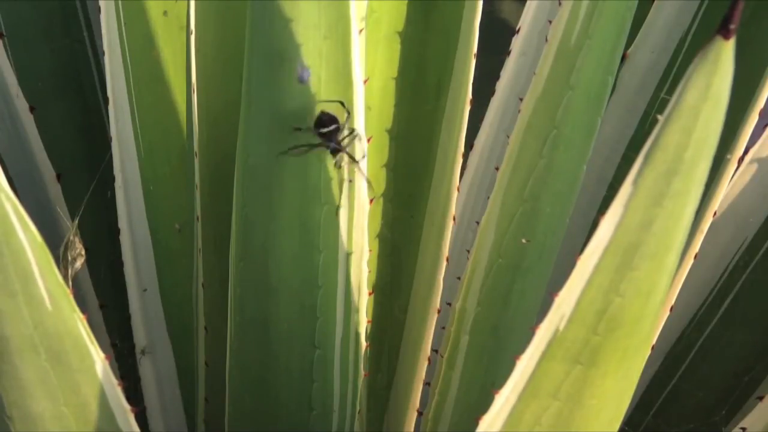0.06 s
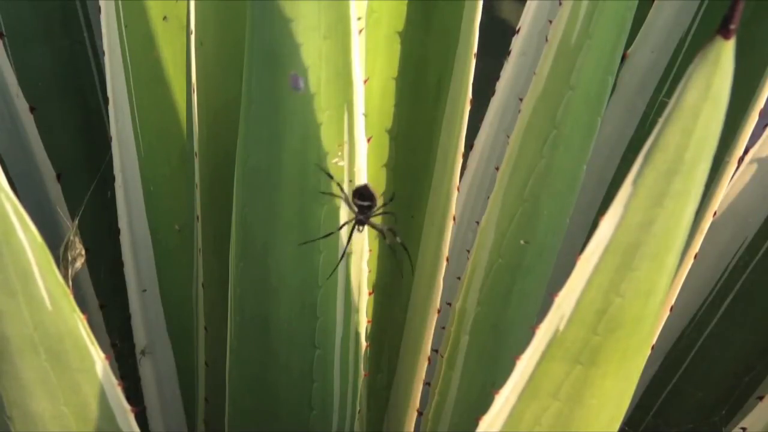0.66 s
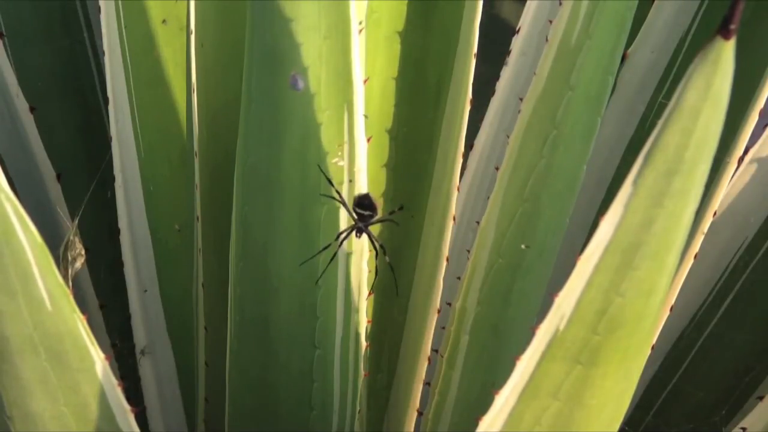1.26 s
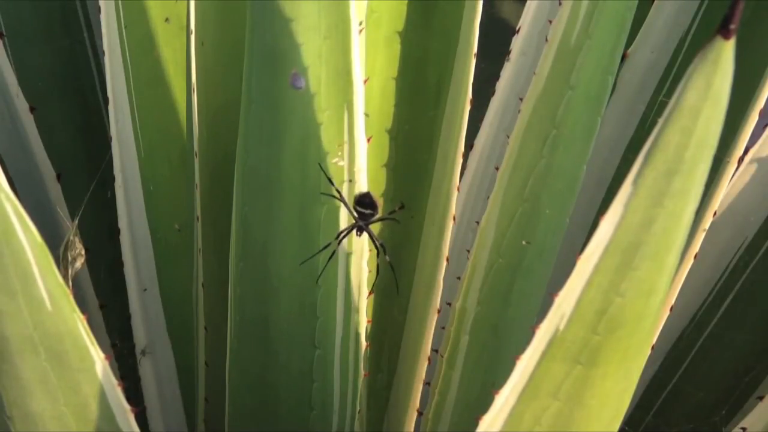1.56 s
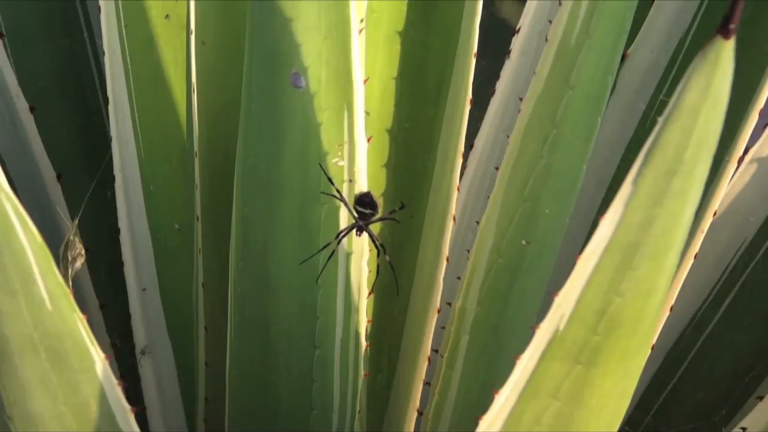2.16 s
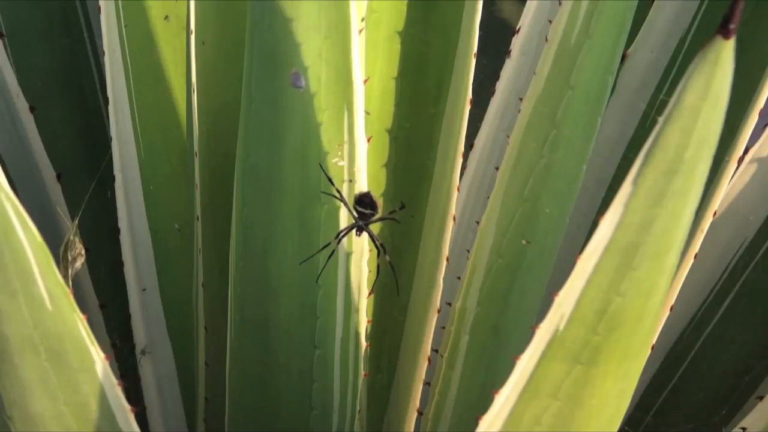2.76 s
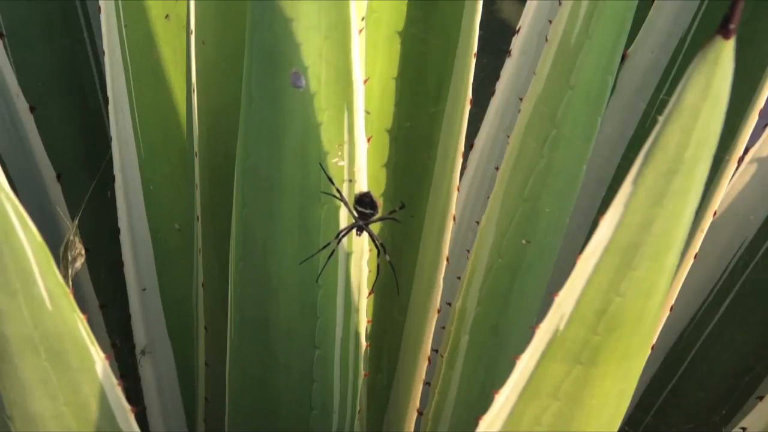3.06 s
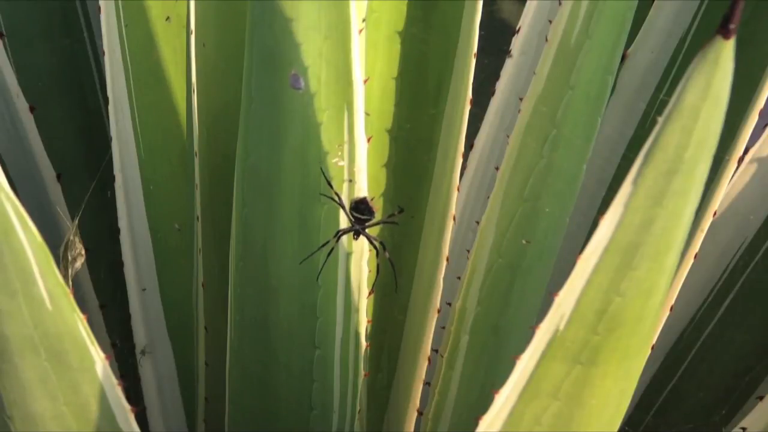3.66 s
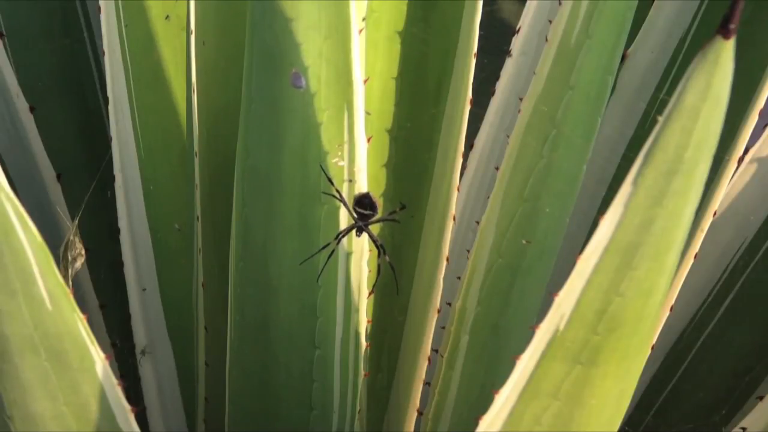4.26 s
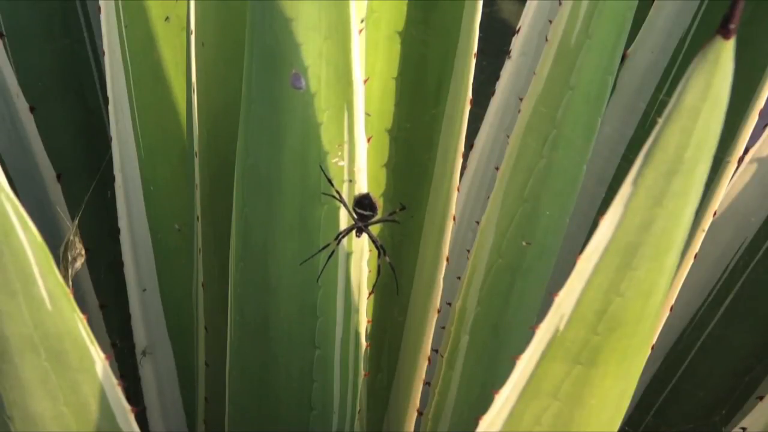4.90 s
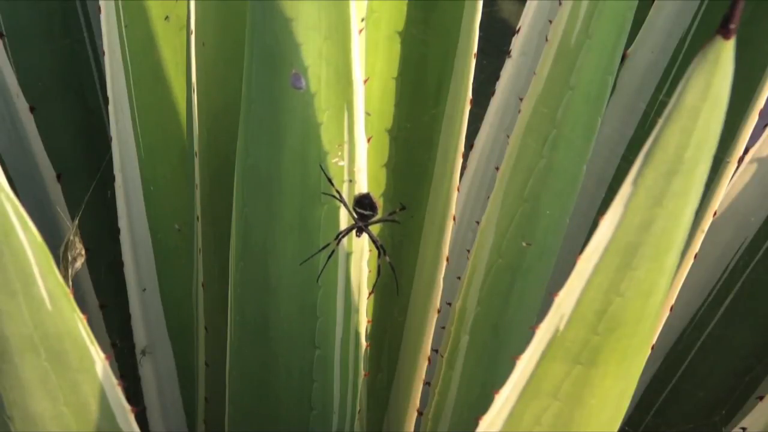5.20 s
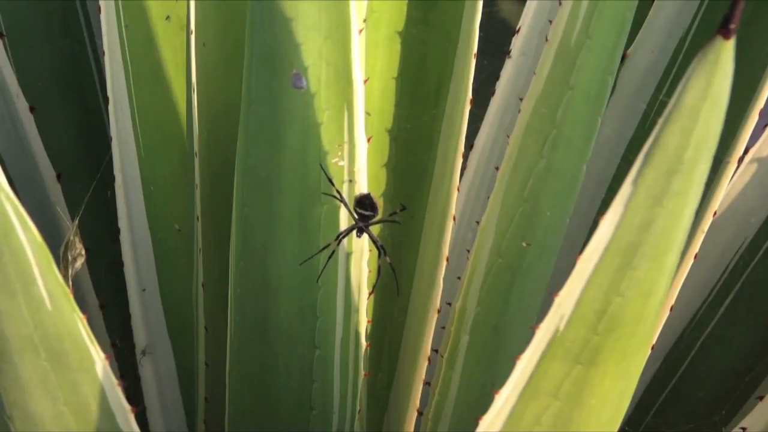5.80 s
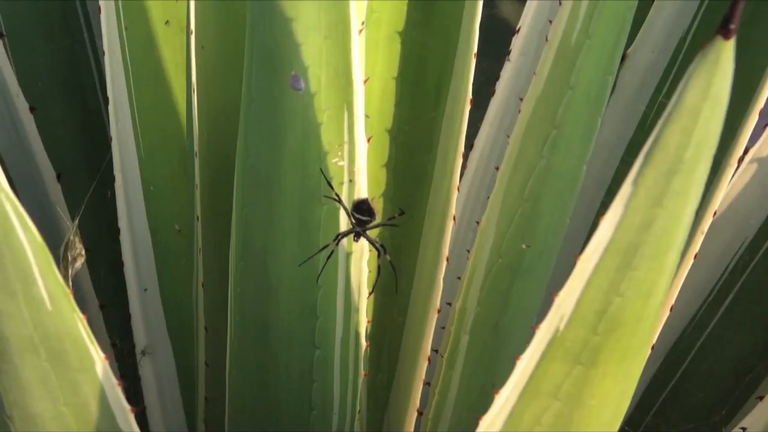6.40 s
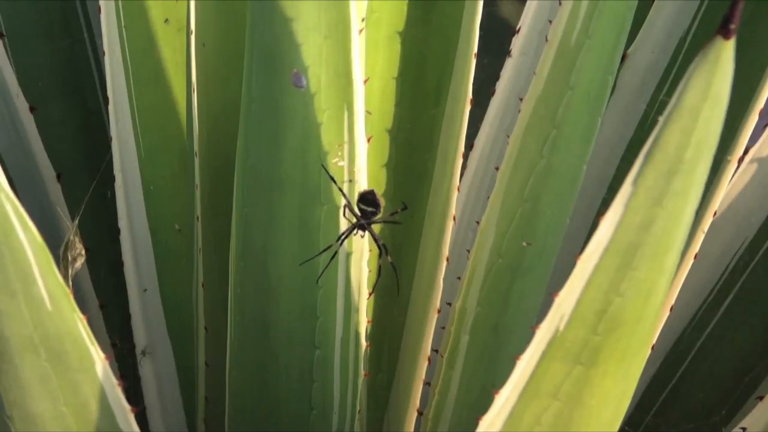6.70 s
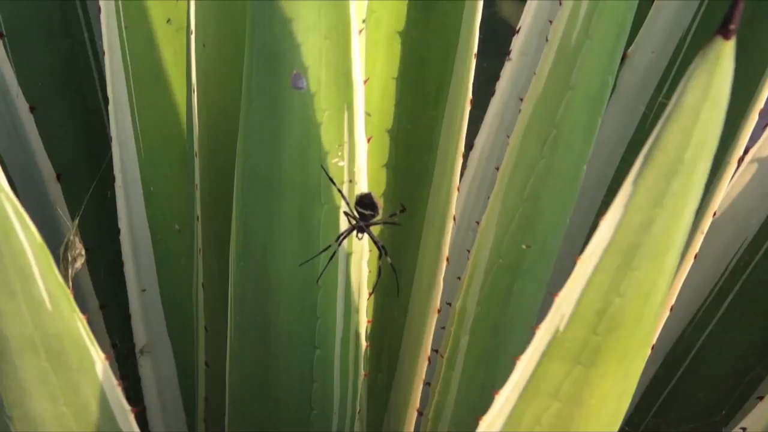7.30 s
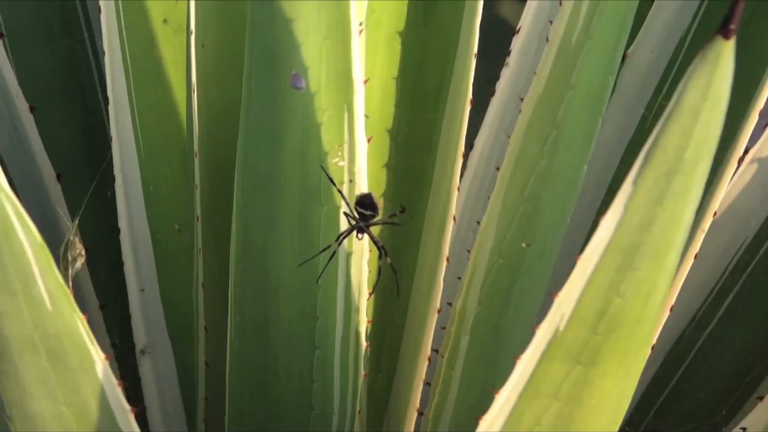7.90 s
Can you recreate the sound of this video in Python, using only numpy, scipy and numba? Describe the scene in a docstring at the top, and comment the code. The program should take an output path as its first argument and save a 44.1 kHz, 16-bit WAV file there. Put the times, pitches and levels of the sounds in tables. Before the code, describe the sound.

In a garden, a songbird straight ahead whistles quick high-low note pairs over distant traffic and soft hiss. A crow on the left gives six harsh, rasping caws while small birds chirp faintly far away. The songbird returns midway, the crow stops, and one sharp chip sounds close by. A last whistled phrase follows near the end, ringing lightly off walls and trees.

```python
"""A garden by day opens on the rush of distant traffic, soft hiss, a faint machine hum and, straight ahead,
a songbird's falling whistles ringing among walls and trees. Small birds start up far away as a crow on
the left begins six caws, each a fluttering rasp pulsed through throat and beak. The songbird returns at
3 s; the crow stops, one sharp chip sounds close by at 5 s, and a last whistled phrase follows at 6.6 s.
Throughout, the recorder's gain control ducks the background under the louder calls."""
import sys
import numpy as np
from scipy import signal
from scipy.fft import rfft, irfft, next_fast_len
from scipy.io import wavfile
from scipy.ndimage import uniform_filter1d, map_coordinates
from numba import njit

SR = 44100
rng = np.random.default_rng(int(sys.argv[2]) if len(sys.argv) > 2 else 0)


def dump_mix(stems):
    """Bounce the given channels to the path in sys.argv[1] as a 16-bit WAV at rate SR."""
    frames = np.atleast_2d(stems).T  # one column per channel
    limited = np.clip(frames, -1, 1)  # hard clip at full scale
    pcm = np.round(limited * 32767).astype(np.int16)
    wavfile.write(sys.argv[1], SR, pcm)


N = 355001

# fader ride of the traffic: time_s, level_db
TRAFFIC_RIDE = [(0, -37.5), (.6, -36.5), (1.15, -34.5), (1.7, -35.5), (2.3, -36), (3.7, -37.5),
                (6.3, -38.5), (7.1, -38.5), (8.05, -37.5)]
# tone of the traffic: frequency_hz, gain_db
TRAFFIC_EQ = [(15, -63), (25, -23), (102, -20), (131, -16.5), (198, -14.5), (264, -9.5), (305, -11),
              (360, -8), (591, -5), (758, -0.5), (823, -2), (1170, -6), (2970, -17.5), (3500, -28.5),
              (4550, -49), (7700, -120)]
# tyre brightness, a shelf above about 1 kHz: time_s, gain_db
TYRE_RIDE = [(0, 0), (2.5, -0.5), (4.8, 0.5), (5.6, -3), (6.5, 2), (7.1, -1), (8.05, -3)]
# tone of the hiss: frequency_hz, gain_db
HISS_EQ = [(1200, -31), (2600, 2.5), (4200, 4), (6000, 1), (8500, -2), (11500, -1.5), (12500, -19)]
# how alike the two sides of the noise beds are: frequency_hz, correlation
BED_LIKENESS = [(60, .05), (280, 0.13), (600, 0.23), (1300, 0.33), (2700, 0.067), (4500, 1), (8000, 1)]
# balance of the noise beds: frequency_hz, left_over_right_db
BED_PAN = [(60, -2.5), (130, -8.5), (280, -4.5), (590, -3), (1280, 0), (2740, 0.5), (5890, 0), (12600, 0)]
# machine tones: pitch_hz, level_db, loudest_at_s, fade_to_half_s
HUM_TONES = [(138, -70, 6.9, 4.4), (321.7, -54, 1.2, 1.1), (269.6, -57.5, 6.8, 3.8), (754, -47, 6.6, 1.8)]
# the garden's reverb tail: frequency_hz, t60_s
GARDEN_DECAY = [(300, 0.36), (1300, 0.91), (2700, 0.83), (3500, 0.65), (6000, 0.83), (11000, 0.38)]

# long slurred whistles: start_s, length_s, level_db, swell_db, crest_share, swell_width_share
SLUR_NOTES = [(2.949, .23, -18, 14, .87, .16), (6.568, .28, -25.5, 9, .64, .33)]
# a high note, then a low one: start_s, high_db, low_db, low_length_s, pitch_ratio
COUPLET_NOTES = [(-.069, -26, -17, 0.078, 1), (0.204, -25, -16.5, 0.078, .998),
                 (3.283, -23.5, -14, 0.1, 0.99), (3.566, -23.5, -14, .077, 0.99),
                 (6.917, -28, -18, 0.1, 1.008), (7.179, -24.5, -19, 0.11, 1)]
# each whistle's fall: start_hz, settled_hz, glide_s
SLUR_GLIDE = (6670, 5780, 0.19)
HIGH_GLIDE, LOW_GLIDE = (5790, 5022, .075), (3770, 3405, .078)
# the farthest bird: start_s, end_s, pitch_hz, level_db
TWITTER_RUN = (.3, 3.2, 4150, -48.5)

# the crow's calls: start_s, length_s, level_db, pitch_hz, flutter_hz, roughness_share, mouth_hz,
# upper_resonances_db, brightening_db, climax_share, left_over_right_db
CAW_CUES = [(.34, 0.38, -24.8, 312.4, 57, 0.09, 1780, 0, -5, 0.79, 9.5),
            (0.929, 0.4, -22.5, 312.5, 56, 0.15, 1730, -.5, 7, 0.76, 10.5),
            (1.675, 0.4, -19.7, 337.9, 52, 0.16, 1760, -1.5, 1.5, .83, 12),
            (2.438, 0.41, -23.3, 343.1, 55.5, 0.14, 1590, -4.7, 3, .86, 9),
            (3.244, .42, -24.3, 337.4, 52, 0.16, 1690, -4, 7, .81, 9.5),
            (4.089, .472, -24.7, 334.3, 53, .15, 1850, -5, 3, 0.77, 9)]
# the course of one caw: length_share, pitch_ratio, pulsing_depth, strain_ratio, beak_opening_db
CAW_SHAPE = [(0, .79, 0.75, .1, -30), (.06, .88, 0.33, 0.22, -8), (.13, 1.02, 0.35, .8, -5),
             (.23, 1.035, 0, .85, -1), (.66, .968, 0.3, 1, 1), (.8, 1.11, 0, 3.4, 4.5),
             (.9, 1.26, 0.4, 1.6, 0.5), (.95, 1, 0.45, .3, -14), (1, .87, 0.8, 0.11, -17)]
SHAPE_CLIMAX = .8  # where that course peaks; each caw gets there sooner or later
# steady throat resonances: centre_hz, width_hz, gain_db
THROAT_MODES = [(1014, 257, -5.5), (1900, 165, -6.5), (2723, 260, -15.5)]
# how the beak radiates: frequency_hz, gain_db
BEAK_EQ = [(250, -30), (550, -13), (950, 2), (2000, -2), (2280, 2), (2600, 5), (2950, -2), (3500, -15),
           (5000, -12.5), (9000, -21)]
CAW_ATTACK_S, CAW_ATTACK_DB = .019, 16.5  # a caw swells from this far below its full level
CAW_SAG_DB_PER_S, CAW_RELEASE_S, CAW_RELEASE_DB = 1.5, .017, 9

# far birds: start_s, pitch_hz, rise_hz, level_db
CHIRP_CUES = [(.43, 4160, -150, -42), (2.125, 4160, 70, -41), (2.275, 4200, 98, -44),
              (2.825, 4100, -130, -44), (5.4, 4290, 127, -40.5), (5.69, 4230, 98, -41),
              (5.845, 3500, 380, -46), (7.605, 4640, 180, -38.5), (7.61, 4260, 98, -46.5),
              (7.96, 3400, 400, -44.5)]
CHIRP_S, CHIRP_ARCH_HZ = .0837, 69.4  # each chirp arches upward in the middle
# dry ticks: start_s, length_s, level_db
TICK_CUES = [(2.404, .04, -48), (5.979, 0.028, -43)]
# tone of a tick: frequency_hz, gain_db
TICK_EQ = [(2500, -40), (4000, -11), (6600, 6), (8000, -33)]
# the close chip: start_s, length_s, pitch_hz, rise_hz, level_db
CHIP_CUE = (4.967, .02, 4775, -2250, -36)


def amp(db):
    return 10 ** (np.asarray(db) / 20)


def unit(x):
    return x / np.sqrt(np.mean(x ** 2) + 1e-20)


def along(points, hz):
    """Read a curve of (frequency_hz, value) points on a log axis."""
    f, v = np.transpose(points)
    return np.interp(np.log(hz + 1), np.log(f + 1), v)


def curves(rows, at):
    """Each column after the first, read at the given places."""
    places, *columns = np.transpose(rows)
    return [np.interp(at, places, column) for column in columns]


def wobble(rate, n):
    """A smooth random curve of n samples, rate knots a second."""
    knots = rng.standard_normal(int(n * rate / SR) + 4)
    return map_coordinates(knots, [np.arange(n) * rate / SR], order=3)


def filtered(x, response):
    """Shape x with a complex frequency response."""
    n = x.shape[-1]
    padded = next_fast_len(n + SR // 8)
    return irfft(rfft(x, padded) * response(np.fft.rfftfreq(padded, 1 / SR)), padded)[..., :n]


def pan(db):
    """Left and right gains whose mean is one; positive is left."""
    gains = np.array([amp(db / 2), amp(-db / 2)]).reshape(2, -1)
    return gains / gains.mean(0)


def add(out, start_s, x):
    """Mix x into out from start_s on."""
    i = round(start_s * SR)
    x = x[:, max(-i, 0):N - i]
    out[:, max(i, 0):max(i, 0) + x.shape[1]] += x


def noise_bed(eq, patchy_db):
    """Stereo noise with patches of random gain, wide in the bass and narrow in the treble."""
    bins = signal.stft(rng.standard_normal((2, N)), nperseg=1024)[2]
    patches = uniform_filter1d(rng.standard_normal(bins.shape[1:]), size=7, axis=0)
    patches = uniform_filter1d(patches, size=10, axis=1)
    noise = signal.istft(bins * amp(patchy_db * unit(patches)), nperseg=1024)[1][:, :N]
    width = lambda f: np.arccos(np.clip(along(BED_LIKENESS, f), -1, 1)) / 2
    mid, side = filtered(noise, lambda f: amp(along(eq, f)) * [np.cos(width(f)), np.sin(width(f))])
    return filtered(np.array([mid + side, mid - side]), lambda f: pan(along(BED_PAN, f))) / np.std(mid)


def traffic():
    """A distant road whose tyre noise comes and goes."""
    t = np.arange(N) / SR
    road = noise_bed(TRAFFIC_EQ, patchy_db=1.0)
    tyres = filtered(road, lambda f: along([(900, .058), (1500, .87)], f))
    road = road + (amp(curves(TYRE_RIDE, t)[0]) - 1) * tyres
    return amp(curves(TRAFFIC_RIDE, t)[0] + .37 * wobble(5.8, N)) * road


def hiss(level_db=-45):
    """A soft, steady bed of treble."""
    return amp(level_db) * noise_bed(HISS_EQ, patchy_db=1.2)


def machine_hum():
    """Wavering tones on the right, each swelling and fading in its own time."""
    t = np.arange(N) / SR
    hum = np.zeros(N)
    for hz, db, crest_s, fade_s in HUM_TONES:
        phase = 2 * np.pi * np.cumsum(hz * (1 + .007 * wobble(16, N))) / SR
        hum += unit(np.sin(phase)) * amp(db + 2.5 * wobble(16, N)) / (1 + ((t - crest_s) / fade_s) ** 2)
    return hum * pan(-20)


def outdoors(x, pan_db, near_db, near_t60, far_db, spread):
    """Direct sound, quick scatter off walls and leaves, and the garden's tail share the energy of x."""
    hz, t, bins = signal.stft(rng.standard_normal((2, SR * 3 // 4)), SR, nperseg=256)
    tail = signal.istft(bins * amp(-60 * t / along(GARDEN_DECAY, hz)[:, None]), SR, nperseg=256)[1]
    t = np.arange(tail.shape[1]) / SR
    tail *= 1 - np.exp(-t / .026)
    scatter = rng.standard_normal(tail.shape) * amp(-60 * t / near_t60) * (t > .004)
    widen = lambda r: np.array([r[0] + spread * r[1], r[0] - spread * r[1]]) / np.linalg.norm(r[0])
    paths = amp(near_db) * widen(scatter)
    paths[:, 0] += 1  # the direct sound
    paths = paths * pan(pan_db) + amp(far_db) * widen(tail) * pan(pan_db / 2)
    heard = signal.fftconvolve(x[None], paths, axes=1)
    return heard * np.linalg.norm(x) / np.linalg.norm(heard.mean(0))


def whistle(glide, length_s, db, swell_db, crest, width, hook_hz=0, hook_s=.006, octave_db=-40):
    """A pure note that swells once while its pitch falls and settles; it may open with an upward hook."""
    start_hz, settled_hz, glide_s = glide
    t = np.arange(int(length_s * SR)) / SR
    fall_hz = (start_hz - settled_hz) * np.maximum(1 - t / glide_s, 0) ** 2
    offset_hz = fall_hz - hook_hz * np.exp(-t / hook_s)
    hz = settled_hz + offset_hz * (1 + .05 * wobble(336, len(t)))  # unsteady until it settles
    swell = amp(swell_db * (np.exp(-((t / length_s - crest) / width) ** 2) - 1))
    phase = 2 * np.pi * np.cumsum(hz) / SR
    tone = unit(np.sin(phase) + amp(octave_db) * np.sin(2 * phase))
    return amp(db) * swell * signal.windows.tukey(len(t), .25) * tone


def songbird(high_length_s=.063, low_delay_s=.05):
    """Long slurs and couplets; echoes beat against the notes, and leaves scatter the high ones more."""
    out = np.zeros((2, N))
    for start_s, *note in SLUR_NOTES:
        slur = whistle(SLUR_GLIDE, *note, octave_db=-30)
        add(out, start_s, outdoors(slur, 0, near_db=-2, near_t60=.27, far_db=-16, spread=.055))
    for start_s, high_db, low_db, low_length_s, ratio in COUPLET_NOTES:
        tuning = np.array([ratio, ratio, 1])
        high = whistle(HIGH_GLIDE * tuning, high_length_s, high_db, swell_db=9, crest=.43, width=.36)
        low = whistle(LOW_GLIDE * tuning, low_length_s, low_db,
                      swell_db=7, crest=.33, width=.36, hook_hz=209)
        add(out, start_s, outdoors(high, 0, near_db=1.5, near_t60=.33, far_db=-12.5, spread=.07))
        add(out, start_s + low_delay_s,
            outdoors(low, 0, near_db=-4, near_t60=.25, far_db=-12.5, spread=.65))
    return out


def peep(length_s, pitch_hz, rise_hz, db):
    """A small bird's note: a short, arched, slightly wavering glide."""
    n = int(length_s * SR)
    sweep = np.linspace(-1, 1, n)
    hz = pitch_hz + rise_hz * sweep / 2 + CHIRP_ARCH_HZ * (.5 - 2 * sweep ** 2)
    hz *= 1 + .0077 * wobble(112, n)
    return amp(db) * np.sin(2 * np.pi * np.cumsum(hz) / SR) * signal.windows.tukey(n, .6)


def twitter(count=20, scatter_hz=70):
    """The farthest bird's faint chirps run together into one wavering line."""
    start_s, end_s, pitch_hz, db = TWITTER_RUN
    song = np.zeros((1, N))
    for k, (late, high, rise) in enumerate(rng.standard_normal((count, 3))):
        note = peep(CHIRP_S, pitch_hz + scatter_hz * high, 2 * scatter_hz * rise, db)
        add(song, start_s + (end_s - start_s) * (k + .3 * late) / count, note[None])
    return outdoors(song[0], 0, near_db=0, near_t60=.25, far_db=2, spread=.1)[:, :N]


@njit
def resonate(x, hz, width_hz):
    """A resonance whose centre moves."""
    y, ring = np.zeros(len(x)), 0j
    for i in range(len(x)):
        ring = ring * np.exp((-np.pi * width_hz + 2j * np.pi * hz[i]) / SR) + x[i]
        y[i] = ring.real * 2 * np.pi * width_hz / SR
    return y


def caw(length_s, db, pitch_hz, flutter_hz, rough, mouth_hz, upper_db, brighten_db, climax,
        throat_width_hz=400., mouth_width_hz=220, mouth_db=-10):
    """Uneven syrinx pulses, shaken in pitch and strength by a slower flutter, ring throat and mouth."""
    n = int(length_s * SR)
    t = np.arange(n) / SR
    progress = np.interp(t / length_s, [0, .5, np.clip(climax, .6, .95), 1], [0, .5, SHAPE_CLIMAX, 1])
    bend, pulsing, strain, open_db = curves(CAW_SHAPE, progress)
    open_db += brighten_db * (t / length_s - .5)
    flutter = 2 * np.pi * np.cumsum(flutter_hz * (1 + .07 * wobble(30, n))) / SR
    slide = -np.sin(flutter) + .4 * np.sin(2 * flutter)  # the pitch leaps up and slides back
    unsteady = np.minimum(strain, 1) * .078 * slide + .013 * strain * wobble(300, n)
    cycles = np.cumsum(pitch_hz * bend * (1 + unsteady)) / SR
    pulses = np.diff(np.floor(cycles), prepend=0) * amp(1.2 * wobble(298.8, n))
    rasp = rng.standard_normal(n) * np.exp(-3 * (cycles % 1))  # air bursts once a cycle
    rasp_share = np.clip(rough * strain, 0, 1)
    syrinx = np.sqrt(1 - rasp_share) * unit(pulses) + np.sqrt(rasp_share) * unit(rasp)
    # the throat stays tuned to the fourth harmonic, which sounds almost alone until the beak opens
    throat_hz = 4 * pitch_hz * bend
    core = resonate(resonate(syrinx, throat_hz, throat_width_hz), throat_hz, throat_width_hz)
    modes = [*THROAT_MODES, (mouth_hz, mouth_width_hz, mouth_db)]
    formants = lambda f: sum(amp(gain_db) * 1j * f * width / (hz * hz - f * f + 1j * f * width)
                             for hz, width, gain_db in modes)
    upper = amp(upper_db + open_db) * filtered(syrinx, formants)
    voice = filtered(core - upper, lambda f: amp(along(BEAK_EQ, f)))
    voice /= np.sqrt(np.abs(uniform_filter1d(voice ** 2, size=SR // 40)) + 1e-12)  # even out the level
    voice = unit(voice * (1 + np.clip(pulsing, 0, 1) * np.cos(flutter)))
    attack_db = CAW_ATTACK_DB * np.exp(-t / CAW_ATTACK_S)
    release_db = CAW_RELEASE_DB * np.maximum(1 - (length_s - t) / CAW_RELEASE_S, 0)
    return voice * amp(db - attack_db - CAW_SAG_DB_PER_S * t - release_db) * signal.windows.tukey(n, .03)


def crow(echo_s=.18, echo_db=-15, echo_edge_hz=2200):
    """Six caws from the left; a far wall throws back a blurred, bright echo of each."""
    out = np.zeros((2, N))
    for start_s, *voice, pan_db in CAW_CUES:
        call = caw(*voice)
        add(out, start_s, outdoors(call, pan_db, near_db=-6, near_t60=.027, far_db=-12, spread=1))
        echo = amp(echo_db) * filtered(call, lambda f: np.minimum((f / echo_edge_hz) ** 2, 2))
        add(out, start_s + echo_s,
            outdoors(echo, 1.6, near_db=-1.5, near_t60=.15, far_db=-7.5, spread=.33))
    return out


def far_chirps():
    """Single peeps of far birds, blurred by echo."""
    out = np.zeros((2, N))
    for start_s, *note in CHIRP_CUES:
        chirp = peep(CHIRP_S, *note)
        add(out, start_s, outdoors(chirp, 0, near_db=-5, near_t60=.2, far_db=-5, spread=.1))
    return out


def ticks():
    """Two dry flecks of bright noise, dead centre."""
    out = np.zeros((2, N))
    for start_s, length_s, db in TICK_CUES:
        n = int(length_s * SR)
        tick = unit(filtered(rng.standard_normal(n), lambda f: amp(along(TICK_EQ, f))))
        add(out, start_s, pan(0) * amp(db) * tick * np.hanning(n))
    return out


def close_chip():
    """One sharp, diving peep close by, with little reverb."""
    out = np.zeros((2, N))
    start_s, *note = CHIP_CUE
    add(out, start_s, outdoors(peep(*note), 0, near_db=-8, near_t60=.15, far_db=-14, spread=.1))
    return out


def gain_control(x, threshold_db=-33, squeeze=.51, fall_db_per_s=18, rise_db_per_s=19,
                 look_ahead_s=.069, hop=256):
    """The gain sinks steadily under loud calls and creeps back after them, so the background ducks."""
    power = np.abs(uniform_filter1d((x ** 2).mean(0), size=4 * hop))[::hop]
    level_db = 10 * np.log10(power + 1e-12)
    gain_db, step_s = [0], hop / SR
    for wanted_db in -squeeze * np.maximum(level_db - threshold_db, 0):
        lowest_db, highest_db = gain_db[-1] - fall_db_per_s * step_s, gain_db[-1] + rise_db_per_s * step_s
        gain_db.append(min(max(wanted_db, lowest_db), highest_db))
    return x * amp(np.interp(np.arange(N) / SR + look_ahead_s, np.arange(len(gain_db)) * step_s, gain_db))


def scene():
    """The lead birds, the small details and the garden's bed beneath them."""
    birds = crow() + songbird() + twitter() + far_chirps() + close_chip()
    return birds + ticks() + traffic() + hiss() + machine_hum()


def record(dry, notch_hz=9950, notch_width_hz=520, notch_db=-22, top_hz=12150):
    """Automatic gain control, a microphone notch in the treble, and nothing above the band limit."""
    notch = lambda f: amp(notch_db * np.exp(-np.abs(f - notch_hz) / notch_width_hz))
    return filtered(gain_control(dry), lambda f: notch(f) * (f < top_hz))


dry = scene()
out = record(dry)
dump_mix(out)
```